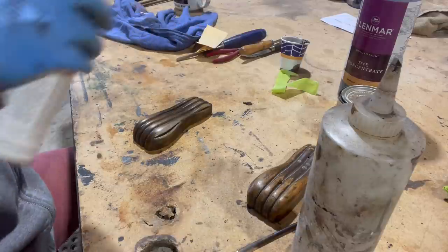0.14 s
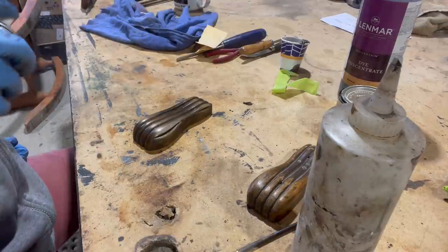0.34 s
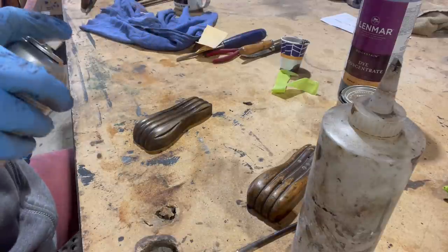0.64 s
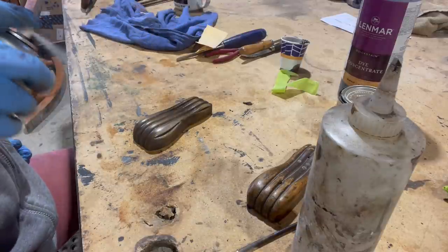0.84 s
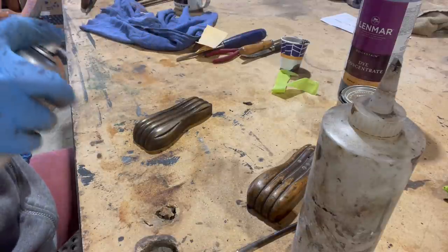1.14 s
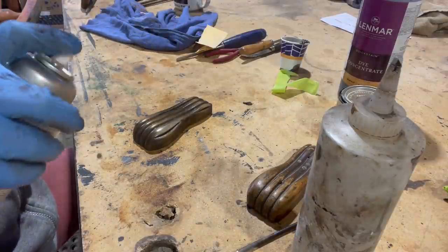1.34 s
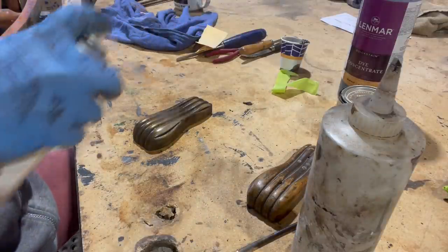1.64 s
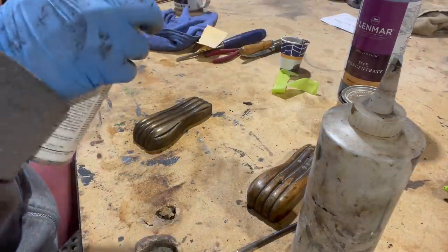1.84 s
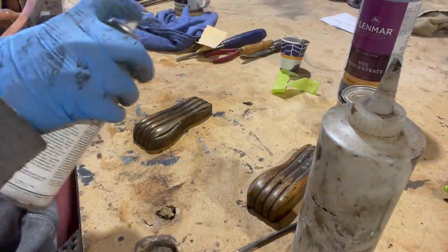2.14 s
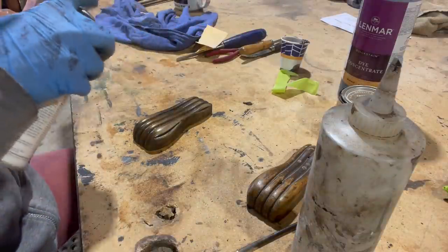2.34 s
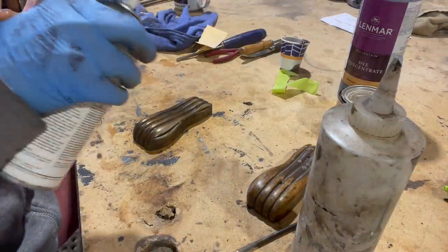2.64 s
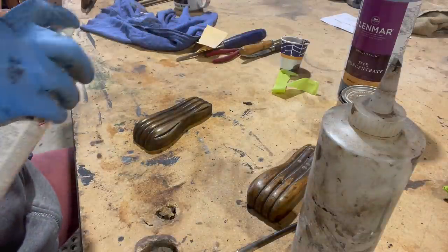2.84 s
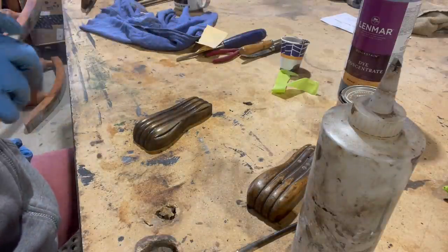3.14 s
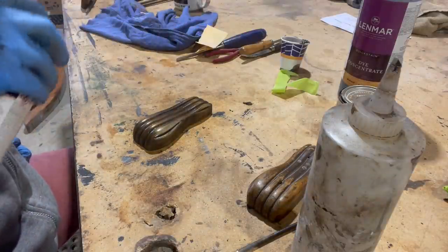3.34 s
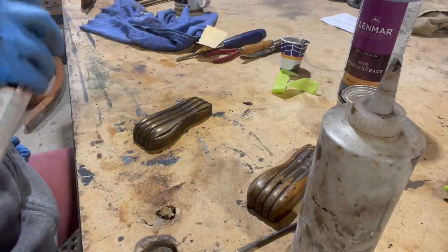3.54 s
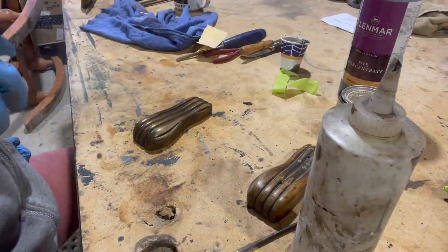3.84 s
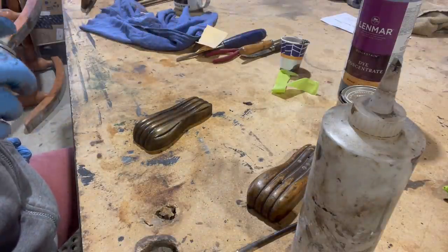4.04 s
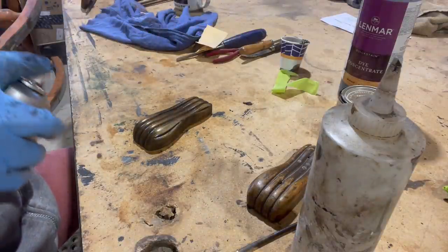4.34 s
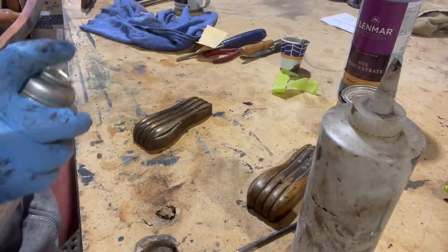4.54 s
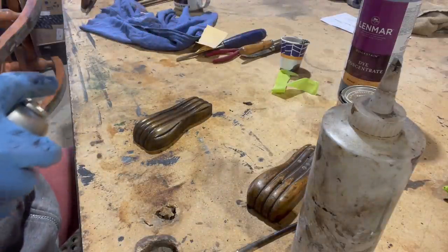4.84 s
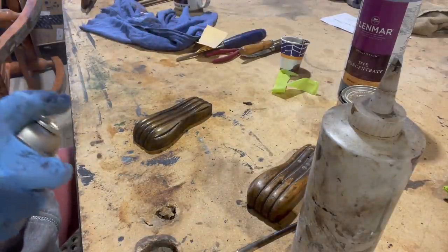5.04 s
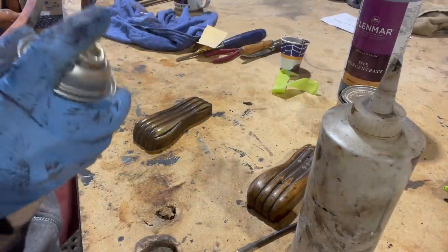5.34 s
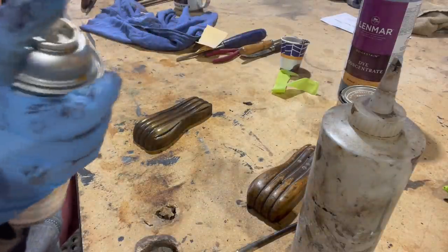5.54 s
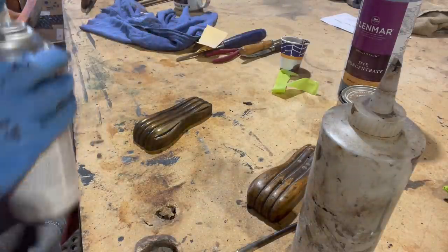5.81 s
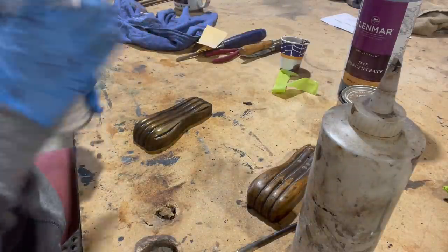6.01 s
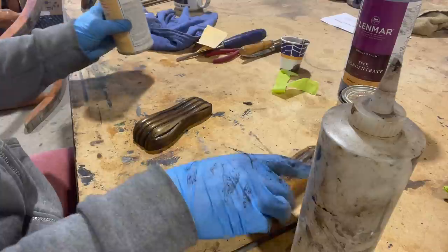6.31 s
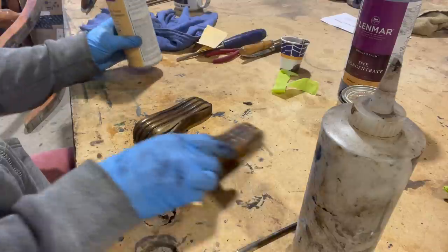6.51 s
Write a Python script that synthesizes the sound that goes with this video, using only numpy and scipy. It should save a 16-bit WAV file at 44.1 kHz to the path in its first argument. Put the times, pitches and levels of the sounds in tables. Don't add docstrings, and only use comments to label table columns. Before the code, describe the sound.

A spray can's mixing ball rattles to rest, then short hissing puffs with plastic nozzle clicks, and finally ball clatter and wooden knocks on a bench.

```python
import sys
import numpy as np
from scipy import signal
from scipy.fft import rfft, irfft, next_fast_len
from scipy.io import wavfile
from scipy.ndimage import uniform_filter1d, map_coordinates

SR = 44100
rng = np.random.default_rng(int(sys.argv[2]) if len(sys.argv) > 2 else 0)


def wrap_up_sound(samples):
    columns = np.atleast_2d(samples).T
    tamed = np.clip(columns, -1, 1)
    steps = np.round(tamed * 32767).astype(np.int16)
    wavfile.write(sys.argv[1], SR, steps)


def linear_from_db(decibels):
    return 10 ** (np.asarray(decibels, float) / 20)


N = 294386
HANDS_FROM_S = 5.4


def unit(x):
    return x / np.sqrt(np.mean(x ** 2) + 1e-20)


def along(points, hz):
    f, v = np.transpose(points)
    return np.interp(np.log(hz + 1), np.log(f + 1), v)


def gains(tables, column, fade=0.002, release=None):
    out = np.zeros(N)
    for rows in tables:
        rows = np.array(rows)
        s, db = rows[:, 0], rows[:, column].sum(axis=1)
        first = max(0, int(SR * s[0]) - SR // 10)
        span = np.arange(first, min(N, int(SR * s[-1]) + SR // 10))
        t = span / SR
        after = np.clip(t - s[-1], 0, None)
        end = linear_from_db(-60 * after / release) if release else np.clip(1 - after / fade, 0, 1)
        start = np.clip(1 + (t - s[0]) / fade, 0, 1) ** 2
        out[span] += start * end * linear_from_db(np.interp(t, s, db))
    return out


def wobble(rate_hz):
    knots = rng.standard_normal(int(N * rate_hz / SR) + 4)
    return map_coordinates(knots, [np.arange(N) * rate_hz / SR])


def filtered(x, response):
    n = min(N, x.shape[-1])
    m = next_fast_len(n + SR // 10, True)
    return irfft(rfft(x, m) * response(np.fft.rfftfreq(m, 1 / SR)), m)[..., :n]


def white():
    return rng.standard_normal((2, N))


def drone(spectrum):
    return unit(filtered(white(), lambda hz: linear_from_db(along(spectrum, hz))))


def noise(spectrum, rough_db=0, rate_hz=300, patchy_db=0):
    z = signal.stft(white(), nperseg=256)[2]
    field = uniform_filter1d(rng.standard_normal(z.shape[1:]), size=4, axis=0)
    field = uniform_filter1d(field, size=10, axis=1)
    pair = signal.istft(z * linear_from_db(patchy_db * unit(field)), nperseg=256)[1][:, :N]
    pair = pair * linear_from_db(rough_db * wobble(rate_hz))
    return unit(filtered(pair, lambda hz: linear_from_db(along(spectrum, hz))))


def resonances(modes):
    def response(f):
        total = 0
        for k, (centre, width, db) in enumerate(modes):
            total = total + (-1) ** k * linear_from_db(db) * 1j * f * width / (centre ** 2 - f * f + 1j * f * width)
        return total
    return response


def ports(pair, alike):
    turn = lambda hz: np.arccos(np.clip(along(alike, hz), -1, 1)) / 2
    mid, side = filtered(pair, lambda hz: np.array([np.cos(turn(hz)), np.sin(turn(hz))]))
    return np.array([mid + side, mid - side])


def lagged(pair, radians):
    return filtered(pair, lambda hz: np.exp(.5j * radians(hz) * np.array([[1], [-1]])))


# t/s, level/dB
RUMBLE_LEVEL = [
    (0.0, -61.5),
    (1.95, -62.5),
    (6.32, -55.5),
    (6.68, -52),
]
# f/Hz, level/dB per Hz
LOW_DRONE = [(25, -37.5), (45, 7), (62, 10), (72, 17.5), (88, 5.5), (110, -45), (300, -120)]
UPPER_DRONE = [(40, -55), (85, 5), (100, 17.5), (114, 24), (128, 7.5), (165, 5), (220, -40), (600, -120)]
# f/Hz, width/Hz, level/dB
WHINE = [(597, 61, -5.5), (917, 25, -4.5)]
# f/Hz, level/dB per Hz
AIR = [(20, -24.5), (150, -2), (300, -13), (600, -21), (900, -13), (1300, -24), (2000, -29.5),
       (5000, -35.5), (7000, -32), (11000, -36.5), (14000, -39), (14900, -77.5)]


def workshop():
    drones = gains([RUMBLE_LEVEL], [1]) * (drone(LOW_DRONE) + linear_from_db(-5) * drone(UPPER_DRONE))
    fan = unit(filtered(white(), lambda f: resonances(WHINE)(f) ** 2))
    whine = linear_from_db(-83 + 2.5 * wobble(1)) * fan
    air = linear_from_db(-72 + 2.5 * wobble(1)) * noise(AIR, patchy_db=1.5)
    return linear_from_db(1) * drones + whine + air


# t/s, length/s, body level/dB, upper body re body/dB, wall re body/dB
ROLLS = [(0.0, 0.024, -48.5, -7.5, -8), (0.149, 0.24, -55, -0.5, -6.5), (1.34, 0.017, -68, -13, -8),
         (1.405, 0.0037, -66.5, -3, 4), (1.467, 0.018, -57, -8, -3), (2.003, 0.075, -75.5, -16, -0.5),
         (2.325, 0.23, -81.5, 12, 12), (2.504, 0.033, -59.5, -9, -10), (2.645, 0.0054, -64, -23, -2),
         (2.822, 0.038, -62.5, -1, -10.5), (2.968, 0.1, -62.5, -1.5, 0.5), (3.092, 0.06, -55, -7, -4),
         (3.23, 0.097, -68.5, 4, 0), (3.355, 0.035, -57, -3, -1), (3.467, 0.019, -60, 2, -4.5),
         (3.656, 0.04, -55, -3.5, -4), (3.904, 0.025, -74, -16, -13), (6.116, 0.14, -75.5, 13, 15),
         (6.276, 0.043, -56.5, -3, 0), (6.362, 0.16, -65, 3.5, 5.5)]
# f/Hz, width/Hz, level/dB
SHELL = [(660, 410, -2.5), (1010, 380, -6.5), (1300, 250, 3)]
UPPER_SHELL = [(1620, 840, 5.5), (2050, 880, 1.5)]
WALL = [(2370, 600, 1), (3010, 630, 3.5), (4080, 1100, 0), (6800, 1000, 0.5), (10500, 4500, -8.5)]


def rolling():
    sag_db, upper_sag_db = -2, -3
    runs = []
    for s, length, db, upper_db, wall_db in ROLLS:
        end = (s + length, db + sag_db, upper_db + upper_sag_db, wall_db)
        runs.append([(s, db, upper_db, wall_db), end])
    grains = white() * linear_from_db(2.2 * wobble(250))
    out = np.zeros((2, N))
    for modes, columns in ((SHELL, [1]), (UPPER_SHELL, [1, 2]), (WALL, [1, 3])):
        part = filtered(grains, lambda f: resonances(modes)(f) ** 2)
        out += gains(runs, columns, fade=0.023, release=0.12) * unit(part)
    return out


def ring(hz, t60, chance):
    t = np.arange(SR // 25) / SR
    scatter_db = 3 * np.tanh(chance[:, :1])
    turn = np.array([[0], [np.pi / 2 * np.sign(chance[1, 1])]])
    onset = 1 - np.exp(-t / 0.00036)
    return linear_from_db(scatter_db - 60 * t / t60) * np.sin(2 * np.pi * hz * t + turn) * onset


def ball(hits, modes, body_t60, crack, shift):
    out, t = np.zeros((2, N + SR)), np.arange(SR // 25) / SR
    firm_db, dulling = -43, 0.48
    for s, body_db, hz, ring_db, *struck_hz in hits:
        wall_db = body_db + ring_db
        tick_db = wall_db - 0.6 + dulling * min(wall_db - firm_db, 0)
        chance = rng.standard_normal((len(modes) + 4, 2, 2))
        body = ring(hz, body_t60, chance[0])
        body += 0.051 * ring(0.82 * hz, 0.05, chance[1])
        body += 0.33 * ring(1.46 * hz, 0.013, chance[-1])
        x = linear_from_db(body_db) * body
        for (f, level, t60), c in zip(modes, chance[2:-2]):
            f *= 1 + shift * c[0, 1]
            mode_db = level + (wall_db - 4 if f < 6000 else tick_db + 2)
            x += linear_from_db(mode_db) * ring(f, t60, c)
        for f in struck_hz:
            x += linear_from_db(wall_db) * ring(f, 0.0081, chance[-2])
        dense = np.diff(rng.standard_normal((2, len(t) + 1)))
        x += crack * linear_from_db(tick_db + 5 - 60 * t / 0.007) * uniform_filter1d(dense, size=2)
        x += crack * linear_from_db(wall_db + 11.5 - 60 * t / 0.011) * uniform_filter1d(dense_wall(len(t)), size=5)
        out[:, round((s + 0.0008) * SR):][:, :len(t)] += x
    return out[:, :N]


def dense_wall(length):
    return np.diff(rng.standard_normal((2, length + 1)))


# t/s, body level/dB, body f/Hz, wall re body/dB, struck wall mode f/Hz
RATTLE = [(0.0079, -15.5, 1202, -1, 3930), (0.04, -23.5, 1460, 1.5, 3100), (.048, -36.5, 1300, -11, 3110),
          (0.056, -41.5, 1300, -4, 4870), (0.078, -24.5, 1380, -4.5, 2530), (0.095, -19, 1240, -13, 2460),
          (0.134, -27, 1310, -10, 2530), (0.149, -24.5, 1790, -14, 3470), (0.162, -20.5, 1300, -5, 3150),
          (0.179, -30.5, 1830, -17.5, 3250), (0.186, -30, 1300, -7.5, 3880), (.204, -46, 1620, -14.5, 3180),
          (.213, -38, 1320, -8.5, 3240), (0.221, -31, 1350, -8, 4900), (0.239, -26, 1740, -2.5, 4900),
          (.242, -34, 1310, -7, 3960), (0.253, -36, 1400, -9, 3630), (0.265, -34, 1480, -1.5, 4030),
          (.273, -36, 1420, -16, 2710), (0.282, -29, 1355, -11, 2990), (0.292, -22, 1550, -9.5, 4640),
          (.302, -39, 1300, -12.5, 3500), (0.316, -29, 1430, -11, 3940), (0.328, -34, 1444, -11, 3870),
          (0.337, -35, 1490, -8, 3230), (.345, -40.5, 1580, -17.5, 3030), (0.359, -32.5, 1410, -8, 3200),
          (.374, -38.5, 1600, -12, 3240), (0.389, -40, 1280, -7, 3070), (.396, -53.5, 1710, -4, 2690)]
# t/s, body level/dB, body f/Hz, wall re body/dB
TICKS = [(0.0082, -18.5, 955, -26), (1.401, -42, 1275, -9.5), (1.472, -44.5, 1240, -25),
         (1.515, -47, 1680, -12.5), (1.813, -54.5, 1260, -1), (1.829, -50, 1290, -5),
         (2.009, -55, 1320, -10), (2.056, -65, 1400, 2), (2.632, -37, 1325, -5), (2.647, -40, 1330, -11),
         (2.906, -54, 1610, -18.5), (3.096, -48, 1350, -23), (3.101, -39, 1420, -18),
         (3.107, -43, 930, -20), (3.114, -40, 1530, -18), (3.121, -48, 1450, -18), (3.128, -44, 804, -20),
         (3.136, -45.5, 1520, -18), (3.146, -49, 1500, -18), (3.165, -58.5, 1590, 6),
         (3.174, -44, 1510, -12), (3.186, -57, 1592, 3.5), (3.23, -49, 1450, -6), (3.2503, -58, 1450, -1),
         (3.26, -57, 1480, -4), (3.327, -46, 1250, 14.5), (3.46, -36, 1584, -9.5), (3.475, -45, 1670, -11),
         (3.653, -38.5, 1283, 3), (3.652, -33.5, 900, -15), (3.678, -35, 1710, -7.5), (3.69, -40, 1390, -5),
         (3.699, -47, 1510, -6), (5.5455, -65.5, 1510, 4.5), (5.6857, -68, 1500, 5.5),
         (5.8175, -59, 1500, -2)]
# f/Hz, level/dB, t60/s
GRIPPED = [(2380, 1, 0.0054), (3260, 2.5, 0.014), (3700, 10.5, 0.0045), (5050, -3.5, 0.009),
           (6700, -2, 0.005), (7650, -1, 0.008), (10410, -3, 0.0066), (13000, -6, 0.0023)]


def rattle():
    return ball(RATTLE + TICKS, GRIPPED, body_t60=0.013, crack=0.62, shift=0.09)


# t/s, peak level/dB, f/Hz
NOZZLE = [(0.4708, -55, 1210), (0.7697, -39, 3480), (1.0914, -55.5, 2430), (1.5817, -43, 3380),
          (2.139, -50, 3580), (2.3911, -44.5, 1530), (2.4027, -31.5, 3340), (2.408, -34.5, 3430),
          (3.55, -38.5, 1474), (3.562, -34, 1600), (4.353, -42.5, 3050), (4.6306, -49, 3700),
          (5.1254, -48.5, 1856)]


def nozzle_taps():
    out = np.zeros((2, N + SR))
    for s, db, hz in NOZZLE:
        chance = rng.standard_normal((2, 2, 2))
        x = ring(hz, 0.0068, chance[0]) + 0.21 * ring(1.2 * hz, 0.002, chance[1])
        rub = uniform_filter1d(rng.standard_normal(x.shape), size=6)
        rub = uniform_filter1d(rub, size=5)
        x += 0.21 * rub * linear_from_db(-60 * np.arange(x.shape[1]) / SR / 0.008)
        out[:, round(s * SR):][:, :x.shape[1]] += linear_from_db(db + 4) * x
    return out[:, :N]


# t/s, length/s, peak hiss level/dB, peak place/0-1, jet re hiss/dB, nozzle beside the ports/0-1
PUFFS = [(0.489, 0.11, -42, 0.73, -3.5, 0.78), (0.79, 0.1, -39.5, 0.54, -3, 0.81),
         (1.116, 0.081, -41, 0.9, -4.5, .7), (1.601, 0.12, -42, 0.7, -1, 0.38),
         (2.148, 0.077, -43, 0.28, -2, 0.35), (2.415, 0.092, -42.5, 0.64, -3.5, 0.2),
         (2.993, 0.094, -42.5, 0, -4.5, 0.62), (3.277, 0.09, -44.5, 0.6, -2.5, 0.71),
         (3.555, 0.063, -43.5, 0.38, -3.5, .99), (4.379, 0.078, -42, 0.5, -1.5, 0.64),
         (4.654, 0.094, -41.5, 0.67, -1, 0.57), (5.151, 0.071, -42.5, 0.69, 0.5, 0.34)]


def valve():
    opening_db, closing_db = -5, -5
    jet_leads_db, jet_fades_db = 1.5, -2
    puffs = []
    for s, length, db, place, jet_db, _ in PUFFS:
        start = (s, db + opening_db, jet_db + jet_leads_db)
        peak = (s + np.clip(place, 0.05, 0.95) * length, db, jet_db)
        end = (s + length, db + closing_db, jet_db + jet_fades_db)
        puffs.append([start, peak, end])
    return puffs


# f/Hz, level/dB per Hz
HISS = [(2000, -60), (5000, -26), (7000, -8), (9000, -3.5), (10500, -5.5), (12000, -1.5), (14000, 0),
        (15500, -4.5), (15900, -38.5)]
# t/s, level/dB
SPITS = [
    (.5485, -34),
    (0.798, -36.5),
    (.832, -42.5),
    (3.325, -49),
]


def propellant():
    flow = gains(valve(), [1], fade=0.015, release=0.04)
    flow += gains([[spit] for spit in SPITS], [1], fade=0.0013)
    return flow * linear_from_db(2.5) * noise(HISS, rough_db=1, rate_hz=460, patchy_db=2)


# f/Hz, level/dB per Hz
JET = [(150, -11), (600, -13.5), (1200, -3.5), (2500, -6), (3800, -2), (4700, 1.5), (5300, -4), (6000, -4),
       (7200, -7.5), (10000, -23), (13000, -87.5)]
# f/Hz, width/Hz, level/dB
CAP = [(3070, 510, -0.5), (4850, 550, 1)]
# t/s, level/dB
CAP_SINGS = [
    [(1.13, -64), (1.195, -60)],
    [(2.41, -49), (2.49, -46.5)],
    [(5.155, -45.5), (5.215, -56)],
]


def jet_roar():
    roar = linear_from_db(2) * noise(JET, rough_db=2, rate_hz=250, patchy_db=2.1)
    cap = unit(filtered(white(), lambda f: resonances(CAP)(f) ** 2))
    return gains(valve(), [1, 2], fade=0.022, release=0.034) * roar + gains(CAP_SINGS, [1], fade=0.012) * cap


# f/Hz, phase/rad
PORT_LAG = [(100, 0), (1200, .5), (2500, 1), (4000, 1.2), (4800, 1.6), (6000, 2.3), (7200, 3), (8000, 3.6),
            (10500, 5.8), (11500, 6.28), (13500, 6.3), (15500, 7.8)]
# f/Hz, phase/rad
JET_LAG = [(300, 0), (1200, .6), (3000, 1.5), (4000, 2.6), (5300, 3.1), (7500, 3.3)]
# f/Hz, likeness/0-1
JET_ALIKE = [(300, .75), (700, .3), (1300, .75), (3000, .85), (5000, .88), (6000, .93), (7500, .93)]


def aimed(jet):
    out = np.zeros((2, N))
    for s, length, *_, beside in PUFFS:
        span = slice(int((s - 0.04) * SR), int((s + length + 0.08) * SR))
        lag = lambda hz: np.clip(beside, 0, 1) * along(JET_LAG, hz) - along(PORT_LAG, hz)
        out[:, span] += lagged(ports(jet[:, span], JET_ALIKE), lag)
    return out


# t/s, length/s, level/dB, from f/Hz, to f/Hz
CIRCLES = [
    (2.004, 0.065, -70.5, 1263, 1350),
    (2.3, 0.077, -73.5, 1557, 1720),
    (2.815, 0.078, -66, 1500, 1407),
    (2.975, 0.079, -54.5, 1322, 1530),
    (3.097, 0.06, -61, 1280, 1566),
    (3.16, 0.051, -64, 1548, 1635),
    (3.654, .045, -55, 913.5, 881),
    (6.131, 0.107, -66, 1606, 1574),
    (6.277, 0.07, -57, 1598, 1610),
    (6.388, .04, -73, 1636, 1620),
]


def circling():
    fuzz_hz, sag_db, octave_db = 110, -1.5, -9
    runs = [[(s, db, from_hz), (s + length, db + sag_db, to_hz)] for s, length, db, from_hz, to_hz in CIRCLES]
    s, _, hz = np.transpose(np.concatenate(runs))
    turn = 2 * np.pi * np.cumsum(np.interp(np.arange(N) / SR, s, hz)) / SR
    fuzz = np.array([wobble(fuzz_hz) + 1j * wobble(fuzz_hz) for _ in range(4)])
    note = fuzz[:2] * np.exp(1j * turn) + linear_from_db(octave_db) * fuzz[2:] * np.exp(2j * turn)
    return gains(runs, [1], fade=0.0043, release=0.033) * unit(note.real)


# t/s, level/dB
SLEEVE = [
    (5.5, -87),
    (5.6, -69.5),
    (5.75, -63.5),
    (5.89, -66),
    (5.92, -49),
    (6.05, -58),
    (6.3, -63),
    (6.45, -56),
    (6.58, -76),
]
# f/Hz, level/dB per Hz
CLOTH = [(200, -61), (600, -20), (1500, -0.5), (3500, -3), (5000, 1), (7000, 6), (11000, -2.5), (15000, -2),
         (15700, -37)]


def sleeve():
    return gains([SLEEVE], [1], fade=0.048) * noise(CLOTH, rough_db=1.5, rate_hz=510, patchy_db=1.2)


# t/s, peak level/dB, brightness/dB
KNOCKS = [(5.905, -53, -22), (5.94, -44, -25), (5.993, -73, -7), (6.268, -43, -10), (6.285, -46, 7),
          (6.294, -39, 8.5), (6.302, -46.5, 3), (6.408, -45, -3), (6.424, -40.5, 7.5), (6.435, -35.5, -9),
          (6.446, -39.5, 9.5), (6.456, -32, 4.5), (6.47, -40.5, 10), (6.492, -66, -25), (6.5893, -36.5, -3),
          (6.594, -34.5, -28), (6.603, -38, -12.5), (6.616, -47, -17), (6.627, -44, -14), (6.636, -47, -14),
          (6.644, -44.5, -12), (6.653, -45, -13), (6.664, -46, -16.5)]
# f/Hz, width/Hz, level/dB
BENCH = [(154.8, 23, 8.5), (268, 41, 4.5), (362, 47, 3), (508, 98, -2)]
BLOCK = [(820, 193, 2), (1155, 350, -1), (1300, 140, -1.5)]


def wood():
    grit = white() * linear_from_db(1.8 * wobble(100))
    scrape = unit(filtered(grit, resonances(BENCH + BLOCK)))
    out = linear_from_db(-8.5) * gains([SLEEVE], [1], fade=0.04) * scrape
    thuds, taps = np.zeros((2, 2, N + SR))
    blunt = np.hanning(SR // 2500)
    length = SR // 50
    for s, db, bright_db in KNOCKS:
        skid = 0.2 * rng.standard_normal((2, length)) * linear_from_db(-60 * np.arange(length) / SR / 0.014)
        skid[0, :len(blunt)] += blunt
        span = slice(round(s * SR), round(s * SR) + length)
        thuds[:, span] += linear_from_db(db + 17) * skid
        taps[:, span] += linear_from_db(db + bright_db + 12) * skid
    steep = lambda f: resonances(BLOCK)(f) / (1 + 1j * f / 2000) ** 2
    late = slice(int(HANDS_FROM_S * SR), N)
    out[:, late] += filtered(thuds[:, late], resonances(BENCH)) + filtered(taps[:, late], steep)
    return out


LOOSE_BODY_HZ = 1604
# t/s, body level/dB, wall re body/dB
BOUNCES = [(5.905, -56, -2), (5.913, -51, -2), (5.933, -56, 0), (5.942, -38.5, 2), (5.962, -49, 10),
           (5.975, -48.5, 10), (5.986, -54, 7.5), (5.997, -44, 4.5), (6.01, -50.5, 6), (6.025, -58, 7),
           (6.047, -53, 12), (6.061, -53, 4.5), (6.078, -51.5, 4.5), (6.094, -46, 9), (6.121, -41, -1.5),
           (6.132, -48, 4), (6.145, -57, 6.5), (6.156, -57, 13), (6.2172, -71, 2)]
# f/Hz, level/dB, t60/s
LOOSE = [(2200, 5, .005), (2880, 7, 0.005), (3500, 5, .004), (4260, 5, 0.009), (7100, 12, 0.008),
         (8780, 4, 0.011), (9720, 1.5, 0.009), (11270, -6, 0.0053), (13100, -8, 0.0086),
         (14550, -1.5, 0.0043)]


def handover():
    hits = np.insert(BOUNCES, 2, LOOSE_BODY_HZ, axis=1)
    return ball(hits, LOOSE, body_t60=0.027, crack=1.2, shift=0.04)


# f/Hz, level/dB, t60/s
SEAM = [(4300, 3, 0.013), (6850, 3, 0.0079), (9700, 5, 0.0061), (12800, -5, .006)]


def seam_buzz():
    start_s, gap_s, level_db, sag_db = 6.1645, 0.0049, -62.5, 1
    hits = [(start_s + k * gap_s, level_db - k * sag_db, LOOSE_BODY_HZ, 20) for k in range(6)]
    return ball(hits, SEAM, body_t60=0.02, crack=0.11, shift=0.008)


# t/s, body level/dB, wall re body/dB
SETTLES = [(6.268, -34, -10.5), (6.289, -43, 1), (6.301, -42, -8), (6.317, -40, -2.5), (6.329, -54.5, 4),
           (6.343, -36.5, -13.5), (6.3538, -48, -1), (6.371, -60, 1.5), (6.387, -44.5, -7.5),
           (6.3968, -56, 8.5), (6.407, -52.5, 4.5), (6.416, -53, 8.5), (6.446, -62, 14), (6.4543, -56, 6),
           (6.4684, -54.5, 8), (6.5104, -57, 3.5)]
# f/Hz, level/dB, t60/s
HANGING = [(2605, 8, 0.012), (3570, 12.5, 0.0084), (4040, -2, 0.019), (4970, 9.5, 0.007),
           (7050, 8.5, 0.013), (8200, 4, 0.007), (9700, 6.5, 0.0063), (12990, 1, 0.0052)]


def settling():
    hits = np.insert(SETTLES, 2, LOOSE_BODY_HZ, axis=1)
    return ball(hits, HANGING, body_t60=0.029, crack=0.57, shift=0.032)


# f/Hz, t60/s
SHOP = [(200, .59), (1500, .41), (5200, .42), (6000, .3), (9000, .21), (14000, .2)]


def echoes(x):
    hz, t, z = signal.stft(rng.standard_normal((2, SR // 2)), SR, nperseg=256)
    decay = linear_from_db(-60 * t / along(SHOP, hz)[:, None])
    tail = signal.istft(z * decay, SR, nperseg=256)[1]
    late = np.pad(x, ((0, 0), (200, 0)))
    return signal.fftconvolve(late, tail / np.linalg.norm(tail[0]), axes=1)[:, :N]


# f/Hz, likeness/0-1
NEAR = [(60, .93), (300, .75), (700, .2), (1300, 0.75), (3000, 0.5), (4500, 0.55), (5600, .5), (6300, .75),
        (7200, 0.93), (8300, .85), (10000, 0.55), (11500, 0.91), (13500, 0.97), (15500, .6)]
FAR = [(60, 0.97), (250, 0.59), (600, 0.091), (5500, 0.23), (6500, 0.41), (7500, 0.7), (10000, 0.93),
       (11500, 0.91), (13300, 0.64), (15000, 0.39)]
# f/Hz, extra phase/rad
WOOD_LAG = [(60, 0), (300, 0.6), (800, 1), (1500, 0.085)]


def scene():
    hits = rattle() + handover() + seam_buzz() + settling()
    no_bass = lambda hz: (1j * hz / (300 + 1j * hz)) ** 2
    can = filtered(hits, no_bass) + rolling() + circling()
    hiss, jet = propellant() + nozzle_taps(), jet_roar()
    handling = sleeve() + wood()
    wet = echoes(linear_from_db(-16) * can + linear_from_db(-15) * (hiss + jet) + linear_from_db(-11) * handling)
    out = ports(can + hiss, NEAR) + aimed(jet) + ports(wet + workshop(), FAR)
    late = int(HANDS_FROM_S * SR)
    aside = linear_from_db(0.6 * np.array([[-1], [1]]))
    out[:, late:] += aside * lagged(ports(handling[:, late:], NEAR), lambda hz: along(WOOD_LAG, hz))
    return out


def top_cut(x):
    return signal.sosfilt(signal.butter(12, 16810, fs=SR, output="sos"), x)


def record(dry):
    ceiling, top_hz = 0.27, 16200
    half = np.array([[1], [-1]])
    bass_tilt = lambda hz: linear_from_db(0.9 * half / (1 + (hz / 130) ** 4))
    heard = filtered(dry, lambda hz: np.exp(.5j * along(PORT_LAG, hz) * half) * bass_tilt(hz))
    rounded = heard / (1 + np.abs(heard / ceiling) ** 3) ** (1 / 3)
    return top_cut(filtered(rounded, lambda hz: 1 / (1 + (hz / top_hz) ** 60)))


dry = scene()
out = record(dry)
wrap_up_sound(out)
```